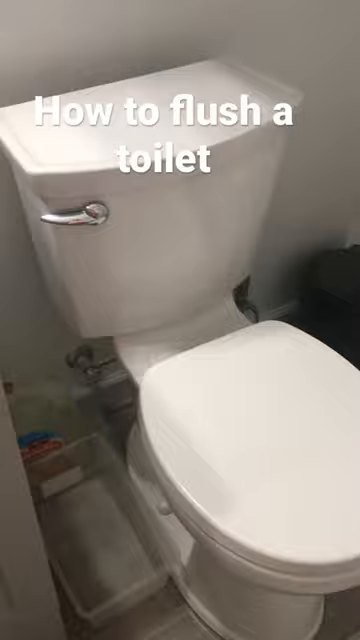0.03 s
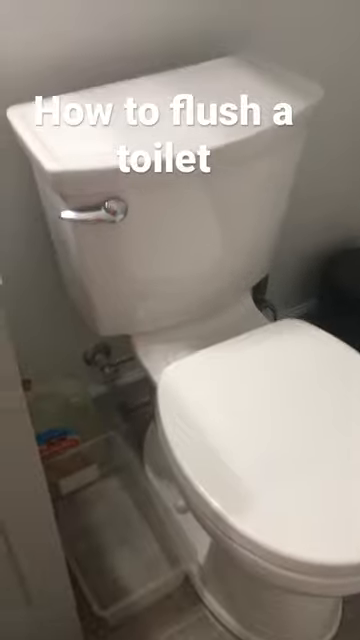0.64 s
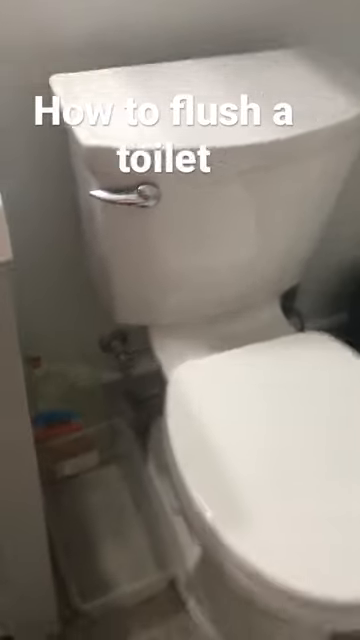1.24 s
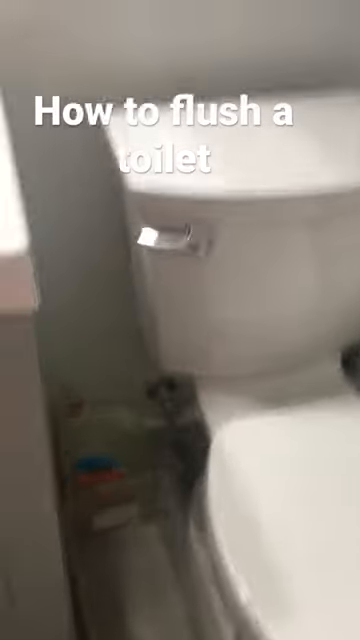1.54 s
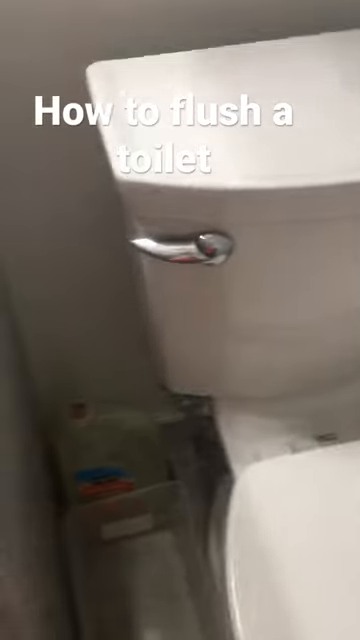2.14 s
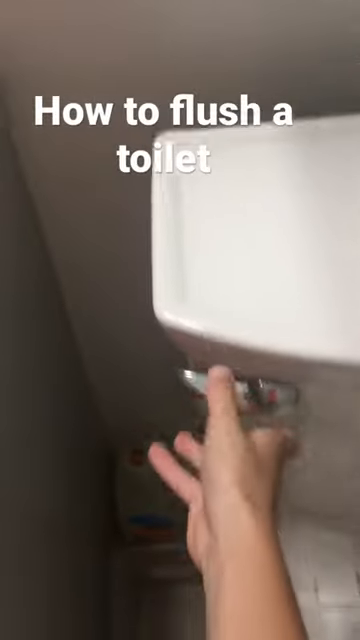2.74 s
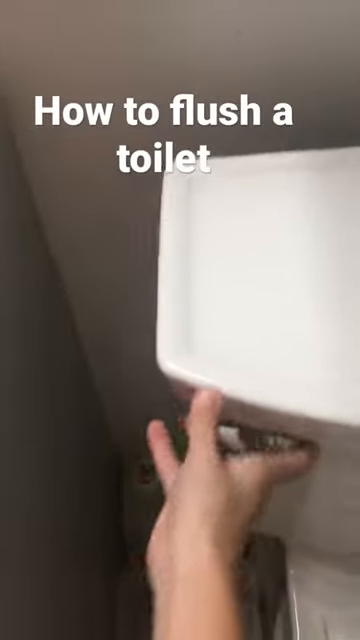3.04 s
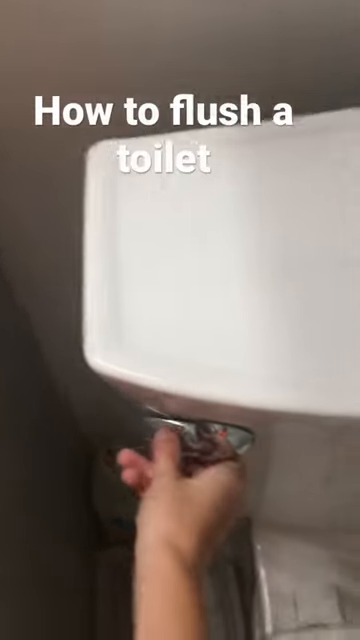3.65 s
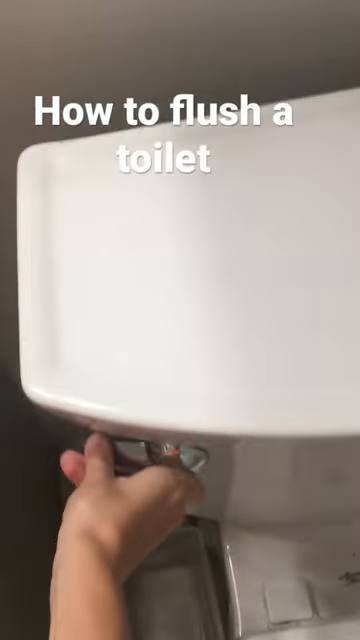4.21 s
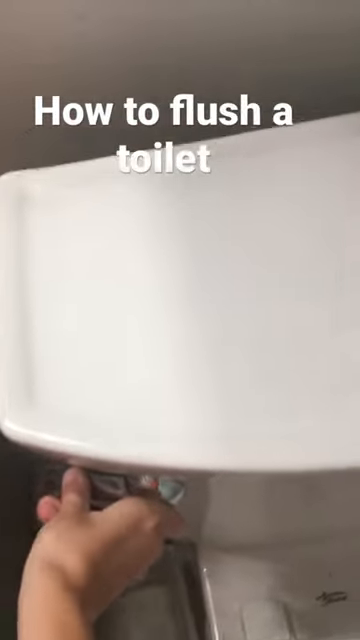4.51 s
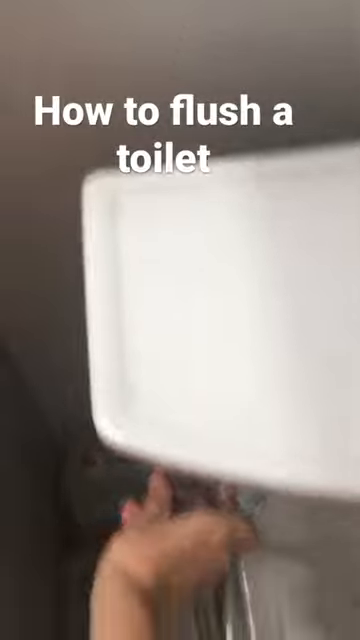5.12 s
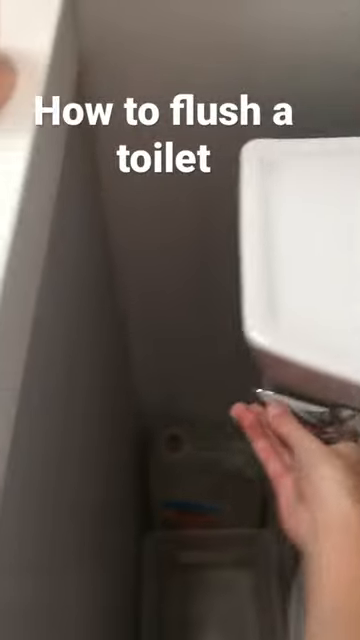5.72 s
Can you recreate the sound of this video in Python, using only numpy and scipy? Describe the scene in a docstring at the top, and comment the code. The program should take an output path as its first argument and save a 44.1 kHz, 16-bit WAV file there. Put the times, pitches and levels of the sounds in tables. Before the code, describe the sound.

A small bathroom is quiet, with a faint low hum that grows slightly after two seconds. From about 0.3 to 2.3 seconds, fingers bump dully on the hand-held microphone, with brief rubs, a soft rustle of clothes and the faint rumble of steps. At about 2.8 seconds a metal toilet handle clinks against the china tank, close by. It clicks again around 3.0 and 3.4 seconds, and most sharply at 4.0, with dull knocks inside the tank. At about 4.6 seconds the valve opens with a soft thump and water begins to hiss. By 4.9 seconds the flush is loud, splashing and bubbling in the closed bowl, with deep gulps and a low boom building underneath. Air spits at 5.2 seconds, and a glug leads into another surge at 5.6. The hard walls add a short echo, and the water is still rushing at the end, near 5.8 seconds.

```python
"""A toilet flushes into its closed bowl: big air pockets gulp in the channels, small bubbles splash and
ring as damped oscillators, the rim jets hiss and spit, and the water column in the trap booms.
Before that, a hand-held phone is carried up through the small, faintly humming bathroom: fingers bump
its case and clothes rustle by friction. Then the metal lever clinks against the china tank, ringing
in its normal modes, and the flapper lifts to release the water."""
import sys
import numpy as np
from scipy import signal
from scipy.fft import rfft, irfft, next_fast_len
from scipy.io import wavfile
from scipy.ndimage import uniform_filter1d

SR = 44100
rng = np.random.default_rng(int(sys.argv[2]) if len(sys.argv) > 2 else 0)


def pcm_store(signal):
    """Save signal as 16-bit PCM."""
    levels = np.round(np.clip(np.atleast_2d(signal), -1, 1) * 32767)
    wavfile.write(sys.argv[1], SR, levels.astype(np.int16).T)


N = 254456
T = np.arange(N) / SR


def undb(db):
    """Amplitude ratio of a level in decibels."""
    return 10 ** (np.asarray(db) / 20)


def unit(x):
    """Normalisation to rms 1."""
    return x / np.sqrt(np.mean(x ** 2))


def impact(x):
    """Normalisation to the energy of a 5 ms blow of rms 1/2."""
    return x / np.sqrt(np.sum(x ** 2) / (.005 * SR)) / 2


def curve(rows):
    """Linear interpolation of (t, value) rows at every sample."""
    return np.interp(T, *np.transpose(rows))


def at_hz(points, hz):
    """Interpolation of (f, value) rows on a log-frequency axis."""
    f, value = np.transpose(points)
    return np.interp(np.log(hz + 1), np.log(f), value)


def colour(x, spectrum):
    """Filtering by a smooth spectral envelope, at rms 1."""
    size = next_fast_len(len(x), True)
    gain = undb(at_hz(spectrum, np.fft.rfftfreq(size, 1 / SR)))
    return unit(irfft(rfft(x, size) * gain, size)[:len(x)])


def resonate(x, hz, width):
    """Second-order resonance with gain 1 at its centre; bandwidth in Hz."""
    return signal.lfilter(*signal.iirpeak(min(hz, SR / 2 - 1), hz / width, SR), x)


def steep_band(x, hz, width):
    """Two equal resonances in cascade."""
    return resonate(resonate(x, hz, width), hz, width)


def fade(t, t60):
    """Exponential decay, 60 dB in t60 seconds."""
    return np.exp(-np.log(1000) * t / t60)


def ramp(start, length):
    """Linear rise from 0 to a steady 1."""
    return np.clip((T - start) / length, 0, 1)


def swell(s, rise_s, fade_db_per_s):
    """Gaussian rise up to time s, then exponential decay."""
    return np.exp(-(np.minimum(T - s, 0) / rise_s) ** 2) * undb(-fade_db_per_s * np.maximum(T - s, 0))


def walk(rate):
    """Smooth random fluctuation of rms 1, with `rate` new values a second."""
    hold = int(SR / rate)
    return unit(uniform_filter1d(np.repeat(rng.standard_normal(N // hold + 1), hold), hold)[:N])


def add(out, s, sound):
    """Superposition of a sound starting at time s."""
    i = max(int(s * SR), 0)
    out[i:i + len(sound)] += sound[:max(N - i, 0)]


# partials of the hum: f/Hz, level/dB
HUM_PARTIALS = [(59.5, -62), (119.5, -56.5), (200, -79.5), (240, -86), (339, -78.5)]
# gain of the hum on the way to the wall: t/s, gain/dB
HUM_APPROACH = [(0, -37), (2.15, -16.5), (2.45, -8.5), (4.4, -8), (5.77, -5)]
# spectrum of the still room: f/Hz, level/dB
AIR_SPECTRUM = [(25, -10.5), (60, 1), (110, -3.5), (230, -4), (370, -12.5), (520, -17.5), (860, -18.5),
                (1800, -23.5), (3600, -25), (4820, -29.5), (6000, -23.5), (7800, -28), (12400, -22.5),
                (15800, -26.5)]
def room_noise():
    """Line spectrum over a noise floor: mains hum, growing near the wall, in still air."""
    hum = sum(undb(db) * unit(np.sin(2 * np.pi * (hz * T + rng.random()))) for hz, db in HUM_PARTIALS)
    air = colour(rng.standard_normal(N), AIR_SPECTRUM) * undb(-66.5 + .5 * walk(3.36))
    return air + hum * undb(curve(HUM_APPROACH) + walk(9.9))


# transmission through the phone case: f/Hz, level/dB
CASE_SPECTRUM = [(50, -7), (110, 1), (200, 6), (350, 5.5), (560, -4.5), (800, -17.5), (1200, -29),
                 (2000, -40), (4500, -45), (12500, -52), (15500, -52)]
def case_bump(bright_db):
    """Impulse response of a damped case: a dull thud, with a tick and a snap if the catch is bright."""
    t = T[:SR // 10]
    slip = rng.standard_normal(len(t))
    thud_hz = 335 * rng.uniform(0.74, 1.35)
    thud = np.sin(2 * np.pi * thud_hz * t) * fade(t, 0.036) * np.minimum(t / 0.0016, 1) ** 2
    scrape = colour(slip, CASE_SPECTRUM) * fade(t, 0.085) * np.minimum(t / 0.0036, 1) ** 2
    tick = resonate(steep_band(slip * fade(t, 0.032), 490, 1100), 810, 1400)
    snap = slip * fade(t, .008)
    edge = undb(2) * impact(tick) + undb(-13.5) * impact(snap)
    return undb(-0.5) * impact(thud) + impact(scrape) + undb(bright_db) * edge


# fingers landing on the case: t/s, level/dB, brightness/dB, slip duration/s
FINGER_CONTACTS = [(0.272, -49, -32, 0), (0.461, -39.5, -41, 0), (0.543, -48, -36, 0),
                   (0.613, -50.5, -38, 0), (0.727, -48.5, -9, .025), (0.842, -45.5, -32, 0),
                   (0.985, -37, -19.5, 0), (1.066, -46, -14, 0), (1.081, -42, -7.5, 0), (1.123, -40, -4, 0),
                   (1.159, -43.5, -22, .025), (1.26, -45.5, -13.5, .025), (1.35, -38.5, 1, .018),
                   (1.403, -32.5, -11.5, .095), (1.876, -34.5, -36, 0), (1.922, -50.5, 0, 0),
                   (2.013, -42, -11.5, 0)]
def fingers():
    """Stick-slip: a finger lands and, if it slides, catches again at uneven gaps, ever more weakly."""
    gap_s, fade_db_per_s = .015, 74
    out = np.zeros(N)
    for s, db, bright_db, slip_s in FINGER_CONTACTS:
        add(out, s, undb(db) * case_bump(bright_db))
        if slip_s:
            for delay in np.cumsum(gap_s * rng.uniform(0.63, 1.3, size=7)):
                gain = (delay < slip_s) * undb(db - 1 - fade_db_per_s * delay)
                add(out, s + delay, gain * case_bump(bright_db))
    return out


# steps and jolts of the arm: t/s, level/dB
JOLTS = [(.62, -59.5), (1.0, -60.5), (1.62, -57), (1.9, -57.5), (2.32, -52.5)]
def steps():
    """Structure-borne sound: steps rumble through the carrying arm into the phone."""
    rumble = unit(resonate(resonate(rng.standard_normal(N), 62, 45), 70, 160))
    return rumble * sum(undb(db) * swell(s, rise_s=0.042, fade_db_per_s=103) for s, db in JOLTS)


# skin and sleeve rubbing past the phone: t/s, nominal duration/s, level/dB
RUBS = [(0.729, .025, -67.5), (0.872, .08, -63.5), (1.066, 0.035, -66.5), (1.341, 0.064, -57),
        (1.403, .04, -53.5), (1.917, .018, -61.5), (2.288, 0.036, -62), (2.766, 0.023, -65.5)]
# treble peaks of the phone's microphone, colouring the hiss of each rub: f/Hz, bandwidth/Hz, level/dB
MIC_PEAKS = [(6300, 4400, 3.5), (9100, 2400, 1), (12300, 3500, 2)]
def scrapes():
    """Dry friction: each rub starts abruptly and dies away as the slip slows."""
    out = np.zeros(N)
    for s, length, db in RUBS:
        t = T[:int(1.5 * length * SR)]
        grip = rng.standard_normal(len(t)) * undb(2.4 * walk(400)[:len(t)])
        rub = sum(undb(peak_db) * unit(steep_band(grip, hz, width)) for hz, width, peak_db in MIC_PEAKS)
        envelope = np.minimum(t / 0.0026, 1) * np.cos(np.pi / 2 * t / t[-1])
        add(out, s, undb(db) * unit(rub) * envelope)
    return out


# reverberation time of the bathroom: f/Hz, T60/s
REVERB_TIMES = [(100, 0.24), (300, 0.57), (800, 0.41), (2000, 0.46), (5500, 0.33), (15000, 0.3)]
def bathroom(x, wet_db):
    """Direct sound plus the diffuse field of close, hard walls; each octave decays at its own rate."""
    t = T[:SR // 2]
    noise, hz = rfft(rng.standard_normal(len(t))), np.fft.rfftfreq(len(t), 1 / SR)
    octave = np.clip(np.log2((hz + 1) / 125), 0, 7)
    tail = np.zeros(len(t))
    for k in range(8):
        band = irfft(noise * np.maximum(1 - abs(octave - k), 0), len(t))
        tail += band * fade(t, at_hz(REVERB_TIMES, 125 * 2 ** k))
    tail *= np.clip(t / 0.0065, 0, 1)
    return x + undb(wet_db) * signal.fftconvolve(x, tail / np.linalg.norm(tail))[:N]


# spectrum of rubbing cloth: f/Hz, level/dB
CLOTH_SPECTRUM = [(200, -18), (600, 0), (1000, -0.5), (1600, -1), (2400, -3.5), (3300, -6), (4800, -13),
                  (6200, -10.5), (9000, -11), (15500, -11)]
# movements of the clothes: t/s, level/dB, rise time/s
CLOTH_MOVES = [(0.881, -68, 0.012), (1.12, -77, 0.033), (1.36, -63.5, 0.029), (1.425, -64, 0.036),
               (2.255, -62.5, 0.029)]
def clothes():
    """Friction noise of fabric: a quick brush with each move, then a slow decay as the cloth settles."""
    rub = colour(rng.standard_normal(N) * undb(3.0 * walk(150)), CLOTH_SPECTRUM)
    envelope = sum(undb(db) * (swell(s, rise, 74) + undb(-7.5) * swell(s, rise, 18))
                   for s, db, rise in CLOTH_MOVES)
    return bathroom(rub * envelope, wet_db=-8)


# normal modes of lever and tank wall: f/Hz, level/dB, T60/s
NORMAL_MODES = [(1480, 0.5, 0.16), (1552, -10.5, 0.026), (1880, -4, 0.029), (2050, -11, 0.09),
                (2450, -11, 0.041), (2620, -3.5, 0.11), (2897, 2.5, 0.038), (3160, 1, .035),
                (3580, 2, 0.029), (4800, 5, 0.013), (5370, -1.5, 0.069), (5520, 1, 0.11), (6800, 3, 0.075),
                (8300, -9, 0.05), (9600, -17, .04), (10800, -9, 0.06), (13100, -14, 0.04),
                (13000, -7, 0.049), (15400, -9, 0.05)]
def strike(metal_db, china_db, treble_db, struck_hz):
    """Modal excitation by impact: one contact cracks, rings the metal and knocks on the china."""
    t = T[:SR // 3]
    hz, mode_db, t60 = np.transpose(NORMAL_MODES)[:, :, None]
    scatter = rng.standard_normal((len(hz), 2))
    place_db = 7 * np.exp(-(np.log2(hz / struck_hz) / 0.48) ** 2)  # the contact point favours some modes
    tilt_db = treble_db * np.log2(hz / 4000) / 2
    gain = undb(mode_db + place_db + tilt_db + scatter[:, :1])
    detuned_hz = hz * (1 + 0.0037 * scatter[:, 1:])
    ring = np.sum(gain * np.sin(2 * np.pi * detuned_hz * t) * fade(t, t60), axis=0)
    contact = rng.standard_normal(len(t))
    # the pressing hand damps the same modes, so the first crack has broad peaks
    crack = sum(g * resonate(contact, f, 0.031 * f) / np.sqrt(f) for f, g in zip(hz[:, 0], gain[:, 0]))
    crack *= fade(t, 0.043)
    tick = steep_band(contact * fade(t, 0.012), 10700, 12200)
    clink = undb(-11) * impact(ring) + impact(crack) + undb(-4 + treble_db / 2) * impact(tick)
    china = resonate(contact, 590, 340) + 1.9 * resonate(contact, 342, 73)
    arm = 1.2 * steep_band(contact, 910, 510) + 1.5 * steep_band(contact, 1340, 440)
    knock = arm * fade(t, 0.036) + 1.16 * china * fade(t, 0.13)
    return undb(metal_db) * clink + undb(china_db) * impact(knock)


# lever meeting its stops: t/s, level/dB, tilt/(dB per 2 octaves), favoured f/Hz
LEVER_CLICKS = [(2.853, -29, -10, 3340), (2.984, -35.5, -8, 5700), (2.998, -34.5, -5.5, 2380),
                (3.413, -39, 21.5, 6270), (3.455, -44, -13, 2860), (3.467, -39.5, -3, 2280),
                (3.981, -26.5, -0.5, 4340), (3.984, -33.5, -11, 1650), (4.026, -43.5, 14, 11000)]
# arm and flapper knocking inside the tank: t/s, level/dB
TANK_KNOCKS = [(2.792, -37), (3.405, -47.5), (3.934, -38.5), (4.462, -46.5), (4.582, -41)]
def lever():
    """Mechanical coupling: bright clicks also jolt the tank, dull knocks also ring the lever."""
    out = np.zeros(N)
    for s, db, treble_db, struck_hz in LEVER_CLICKS:
        add(out, s, strike(metal_db=db, china_db=-51.5, treble_db=treble_db, struck_hz=struck_hz))
    for s, db in TANK_KNOCKS:
        add(out, s, strike(metal_db=db - 9.5, china_db=db, treble_db=-23, struck_hz=1550))
    return bathroom(out, wet_db=-4)


OPEN_S = 4.54  # the flapper lifts
RUNNING = ramp(OPEN_S, 0.018)
RUNNING_RMS = np.sqrt(RUNNING.mean())  # refers levels to the time the water runs
def bubbles(count, low_hz, high_hz, cycles, spread_db):
    """Bubble resonance: a swarm of damped oscillators of all sizes, each rising slightly in pitch."""
    out = np.zeros(N)
    for when, size, strength, length in rng.random((count, 4)):
        hz = low_hz * (high_hz / low_hz) ** size
        life = cycles * (.5 + length) / hz
        t = T[:int(life * SR)]
        ring = np.sin(2 * np.pi * hz * t * (1 + .1 * t / life)) * fade(t, life)
        gain = hz / high_hz * undb(-spread_db * np.log(strength + 0.01))
        add(out, OPEN_S + when * (T[-1] - OPEN_S), gain * ring)
    return unit(out)


def water(swarm, foam_db, spectrum):
    """Incoherent sum of ringing bubbles and the smooth noise of foam, under one spectral envelope."""
    foam = unit(RUNNING * rng.standard_normal(N))
    return RUNNING_RMS * colour(swarm + undb(foam_db) * foam, spectrum)


# water running into the bowl: t/s, level/dB
FLOW_LEVEL = [(4.54, -68), (4.59, -57), (4.628, -61.5), (4.964, -35.5), (5.048, -42.5), (5.12, -42),
              (5.216, -52), (5.226, -43.5), (5.35, -43.5), (5.46, -38), (5.542, -38.5), (5.6, -29),
              (5.75, -42), (5.77, -34.5)]
# spectrum of the splashing: f/Hz, level/dB
SPLASH_SPECTRUM = [(250, -3), (500, -9), (1000, 0.5), (1700, 0), (2300, -2), (3100, -1.5), (4200, -8),
                   (6000, -10.5), (7500, -11.5), (15000, -40)]
# modes of the air under the lid: f/Hz, bandwidth/Hz, gain/dB
BOWL_MODES = [(512, 16, 11), (665, 10.6, 14), (899.5, 7.9, 9), (1021, 22, 5), (1139, 8.3, 9.5),
              (1404, 24, 5), (2086, 29, -7), (2266, 30, 4.5), (2990, 19, -9), (5760, 78, 5.5)]
def splash():
    """Cavity resonance: small splashing bubbles excite the air enclosed in the bowl."""
    swarm = bubbles(count=1500, low_hz=455, high_hz=7020, cycles=56, spread_db=1.5)
    source = water(swarm, foam_db=-3.5, spectrum=SPLASH_SPECTRUM) * undb(0.75 * walk(35))
    cavity = sum(undb(db) * resonate(source, hz, width) for hz, width, db in BOWL_MODES)
    return RUNNING_RMS * unit(source + cavity) * undb(curve(FLOW_LEVEL) - 3)


# air passing the flapper and the rim holes: t/s, f/Hz, level/dB
GAP_TONES = [(4.555, 4270, -65), (4.584, 3060, -60), (4.721, 5790, -56), (4.728, 1220, -58),
             (4.818, 2960, -46.5), (5.235, 6470, -47)]
def whistles():
    """Flow-excited resonance: narrow gaps whistle as water drives trapped air through them."""
    quality, t60 = 13, 0.57
    out, t = np.zeros(N), T[:SR // 2]
    for s, hz, db in GAP_TONES:
        tone = unit(steep_band(rng.standard_normal(len(t)), hz, hz / quality))
        add(out, s, undb(db) * tone * fade(t, t60))
    return out


# spectrum of the churning channels: f/Hz, level/dB
CHURN_SPECTRUM = [(50, -15), (100, -2.5), (135, -3), (185, 3), (260, -9.5), (380, -7.5), (450, -16.5),
                  (530, -23.5), (700, -10), (1200, -31.5)]
def churn():
    """Two-phase flow: large bubbles churn, loudest while water purges the channels of air."""
    before_db, purge_db, after_db = -54, -33.5, -40
    purge_s, attack_s, hold_s, release_s = 4.76, 0.14, 0.363, 0.045
    level_db = (before_db + (purge_db - before_db) * ramp(purge_s, attack_s)
                + (after_db - purge_db) * ramp(purge_s + attack_s + hold_s, release_s))
    swarm = bubbles(count=300, low_hz=90, high_hz=718, cycles=16, spread_db=2)
    source = water(swarm, foam_db=4.8, spectrum=CHURN_SPECTRUM)
    flapper_open = ramp(4.58, 0.011)
    return flapper_open * source * undb(level_db + 1.2 * walk(35))


# loudest gulps of the flush, with the valve's thump and one short whistle:
# t/s at the crest, f/Hz, level/dB, rise time/s
FLUSH_TONES = [(4.588, 199, -36, 0.0061), (4.595, 118, -39, 0.0061), (4.88, 127, -23, .022),
               (4.9, 1004, -38.5, 0.043), (4.96, 2875, -33, 0.0098), (4.965, 998, -34, 0.028),
               (4.972, 331, -28, 0.0078), (5.068, 194.2, -24, 0.0051), (5.143, 177.7, -18, 0.0053),
               (5.175, 140, -26, 0.011), (5.205, 520, -38, 0.024), (5.535, 193.5, -28.5, .02),
               (5.6, 2280, -35.5, .012), (5.612, 668, -25, .048), (5.612, 1115, -33.5, 0.038)]
def gulps():
    """Damped oscillation: gulps, a valve thump and a short whistle swell, wobble and sag in pitch."""
    t60, sag_hz_per_s = .13, 122
    out = np.zeros(N)
    t = T[:SR // 2] - .1  # time from the crest
    for s, hz, db, rise_s in FLUSH_TONES:
        envelope = np.exp(-(np.minimum(t, 0) / rise_s) ** 2) * fade(np.maximum(t, 0), t60)
        envelope *= undb(1.44 * walk(190.2)[:len(t)])
        pitch = (hz - sag_hz_per_s * t) * (1 + 0.0087 * walk(205)[:len(t)])
        add(out, s + t[0], undb(db) * envelope * np.sin(2 * np.pi * np.cumsum(pitch) / SR))
    return out


# spectrum of the rim jets: f/Hz, level/dB
SPRAY_SPECTRUM = [(1500, -8), (4000, 2), (6000, -3.5), (7500, -3.5), (8600, 1), (9800, 3), (10500, -3),
                  (11400, 2.5), (14200, -0.5), (15700, -2.5)]
# waves slapping the bowl and throwing extra spray: t/s, gain/dB, half-width/s
WAVE_SLAPS = [(4.965, 6, 0.028), (5.11, 2, 0.018), (5.575, 7, 0.028)]
def spray():
    """Jet noise: the sputtering rim jets follow the flow, choked briefly until an air plug bursts out."""
    start_s, burst_s, choke_s = 4.64, 5.22, 0.043
    choke_db = -13 * np.exp(-abs(T - burst_s) / choke_s) * (T < burst_s)
    slap_db = sum(db * np.exp(-((T - s) / width_s) ** 2) for s, db, width_s in WAVE_SLAPS)
    sputter_db = 1.06 * walk(45)
    level_db = -26.5 + .5 * curve(FLOW_LEVEL) + choke_db + slap_db + sputter_db
    swarm = bubbles(count=4000, low_hz=3930, high_hz=15080, cycles=2.2, spread_db=0.5)
    return water(swarm, foam_db=0.5, spectrum=SPRAY_SPECTRUM) * ramp(start_s, 0.015) * undb(level_db)


# bursts of air and spray from the rim: t/s, level/dB, T60/s
RIM_BURSTS = [(4.641, -53.5, 0.62), (4.783, -43.5, 0.5), (5.22, -29.5, 0.096)]
# resonances of the rim holes: f/Hz, bandwidth/Hz, level/dB
HOLE_MODES = [(6580, 350, -11), (8130, 790, -9)]
def spits():
    """Transient jets: trapped air escapes in a high hiss that rings the rim holes."""
    out, t = np.zeros(N), T[:SR // 2]
    for s, db, t60 in RIM_BURSTS:
        air = rng.standard_normal(len(t))
        jet = unit(steep_band(air, hz=13100, width=6000))
        holes = sum(undb(hole_db) * unit(steep_band(air, hz, width)) for hz, width, hole_db in HOLE_MODES)
        add(out, s, undb(db) * (jet + holes) * fade(t, t60))
    return out


def drain():
    """Column resonance: water in the trap booms on one low note amid a rumble, building as the bowl fills."""
    start_s, boom_hz, growth_db_per_s = 4.83, 57.5, 12
    boom = unit(np.sin(2 * np.pi * np.cumsum(boom_hz * (1 + 0.028 * walk(20))) / SR))
    rumble = unit(resonate(resonate(rng.standard_normal(N), 72, 40), 80, 50))
    column = undb(-2.5 + 1.1 * walk(11)) * boom + undb(-11.5) * rumble
    slug_db = 16 * np.exp(-((T - 5.075) / 0.043) ** 2)  # the first slug of water tips into the trap
    return ramp(start_s, .1) * column * undb(-48 + growth_db_per_s * (T - start_s) + slug_db)


def glug():
    """Resonance of a shrinking cavity: as water rises under the lid, the note climbs and settles."""
    start_s, start_hz, climb_hz, climb_s = 5.425, 626, 267, 0.0179
    out, t = np.zeros(N), T[:SR // 2]
    pitch = (start_hz + climb_hz * (1 - np.exp(-t / climb_s))) * (1 + 0.015 * walk(155)[:len(t)])
    envelope = np.minimum(t / 0.0047, 1) * fade(t, 0.66) * undb(-36 + 3.1 * walk(94)[:len(t)])
    add(out, start_s, envelope * np.sin(2 * np.pi * np.cumsum(pitch) / SR))
    return out


def slosh(x, depth_db, rate):
    """Amplitude modulation: water opens and closes cavities, so each third-octave swells on its own."""
    size = next_fast_len(N, True)
    spectrum, hz = rfft(x, size), np.fft.rfftfreq(size, 1 / SR)
    third = np.clip(3 * np.log2((hz + 1) / 630), 0, 14)
    bands = (irfft(spectrum * np.maximum(1 - abs(third - k), 0), size)[:N] for k in range(15))
    return sum(band * undb(depth_db * walk(rate)) for band in bands)


def flush():
    """Reverberation of the water sounds: splash and hiss carry more of it than gulps and boom."""
    high = slosh(splash() + spray(), depth_db=1.6, rate=24) + whistles() + spits()
    low = churn() + gulps() + drain() + glug()
    return bathroom(high, wet_db=-3.5) + bathroom(low, wet_db=-8.5)


def scene():
    """Superposition of all sources at one microphone, the same in both channels."""
    return np.tile(room_noise() + fingers() + steps() + scrapes() + clothes() + lever() + flush(), (2, 1))


def record(dry):
    """Band limiting: the phone cuts the deepest bass and the highest treble."""
    thin = signal.sosfilt(signal.butter(2, 33, "high", fs=SR, output="sos"), dry)
    return signal.sosfilt(signal.ellip(10, .2, 70, 15750, fs=SR, output="sos"), thin)


dry = scene()
out = record(dry)
pcm_store(out)
```